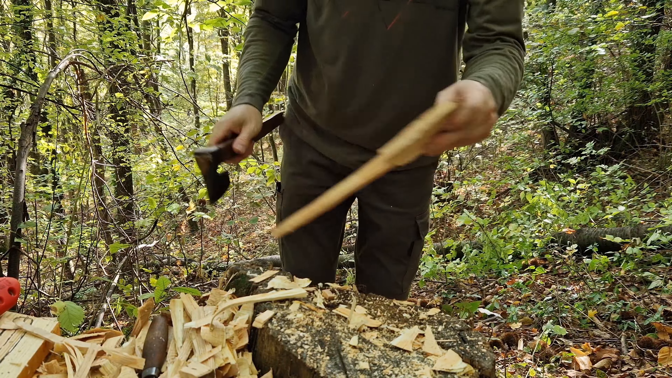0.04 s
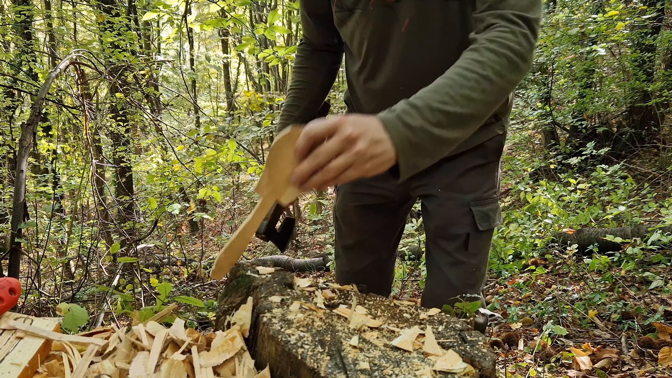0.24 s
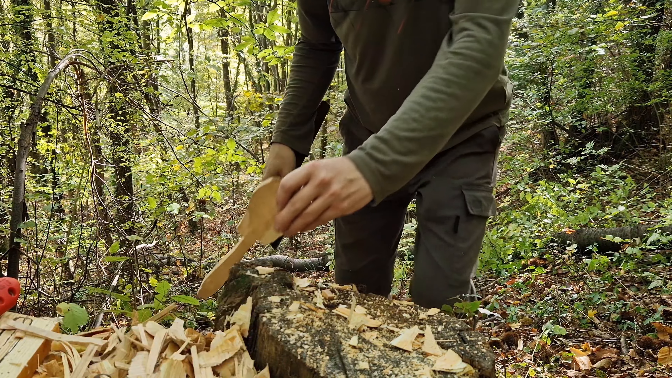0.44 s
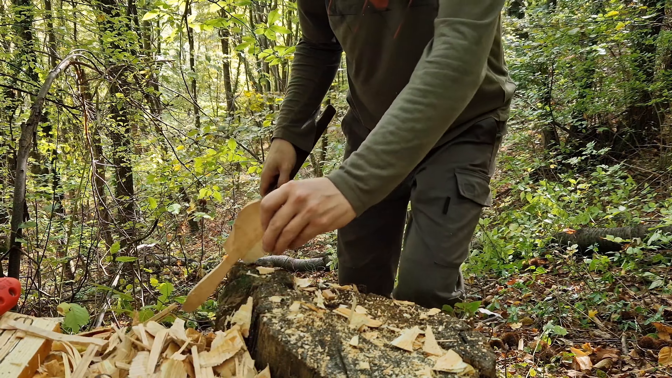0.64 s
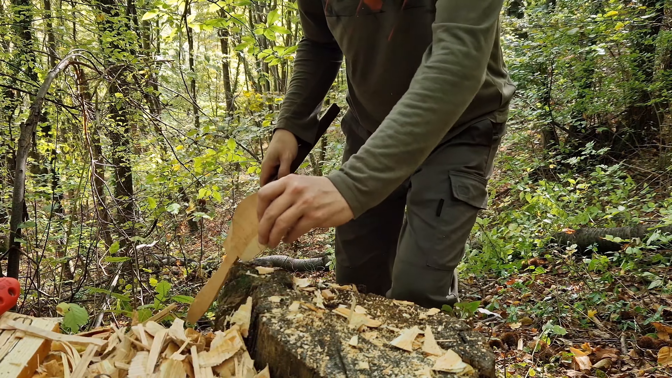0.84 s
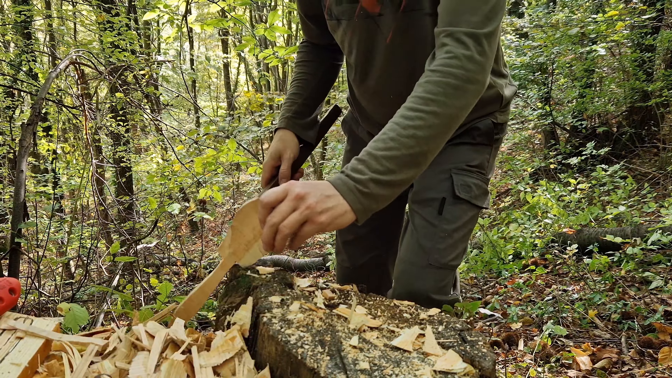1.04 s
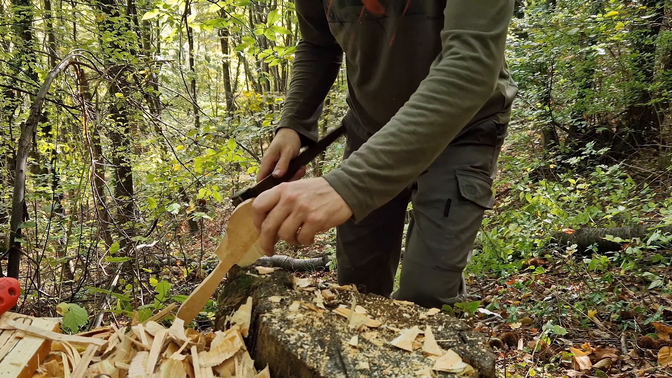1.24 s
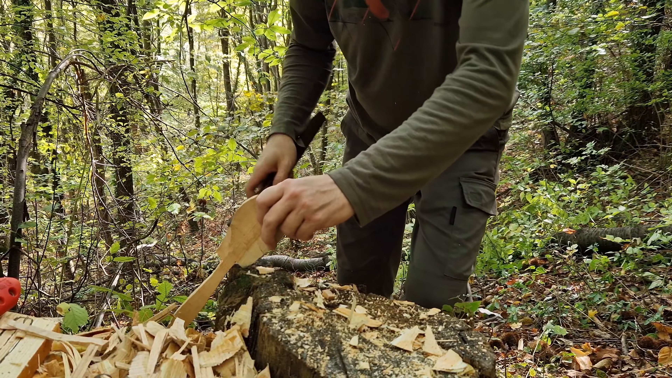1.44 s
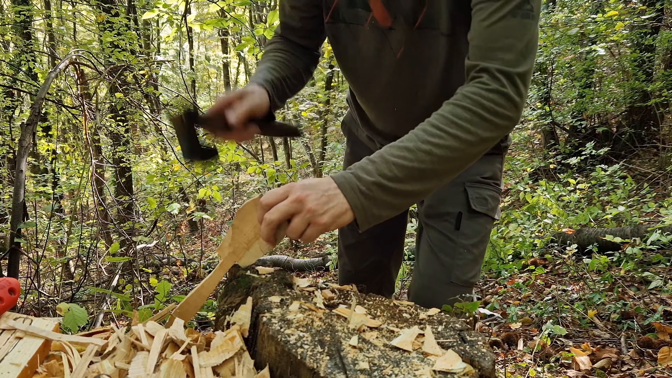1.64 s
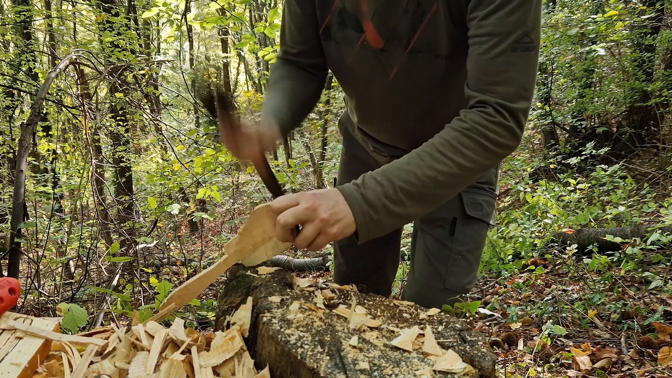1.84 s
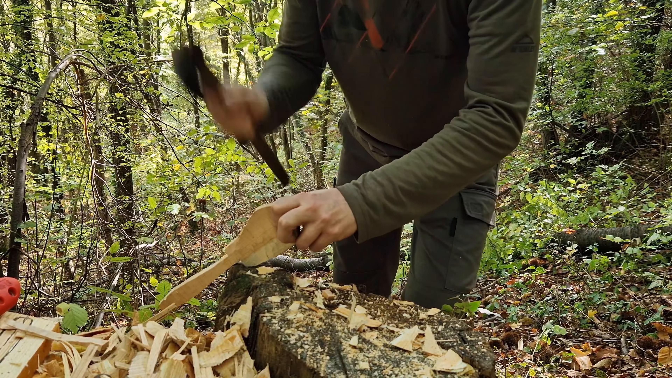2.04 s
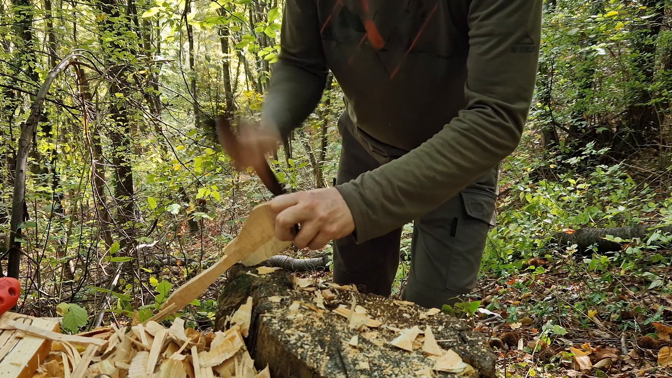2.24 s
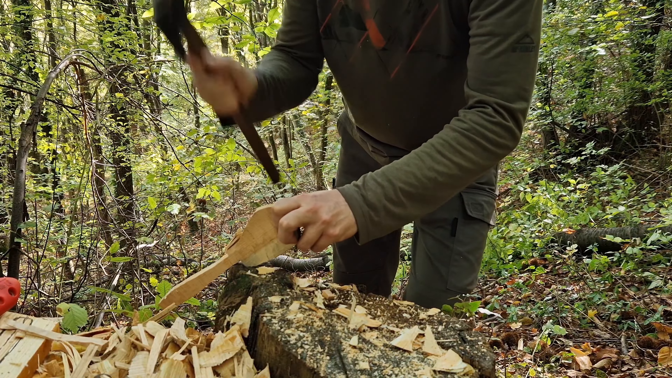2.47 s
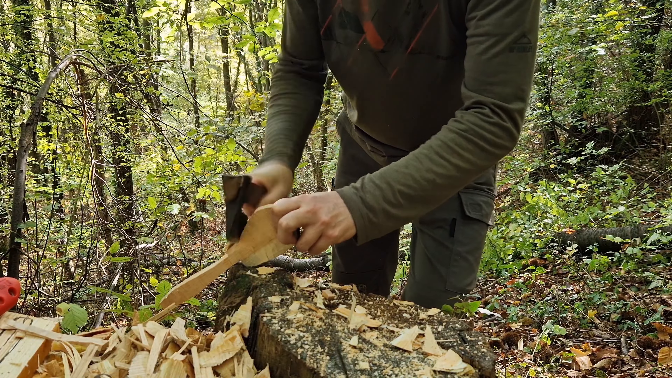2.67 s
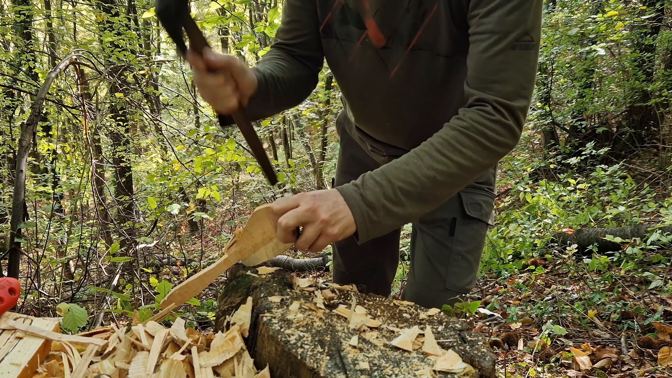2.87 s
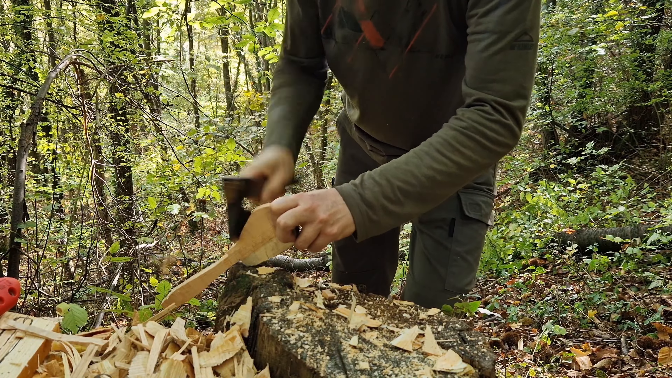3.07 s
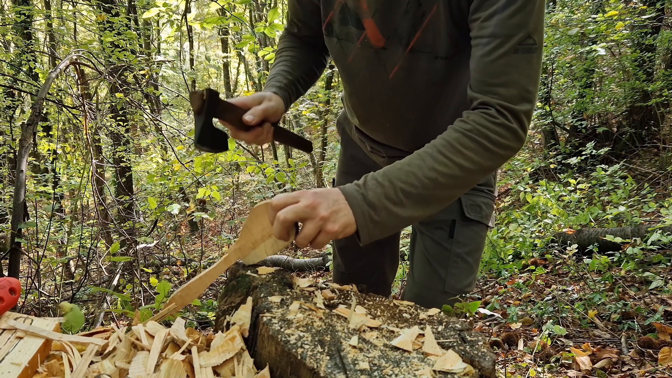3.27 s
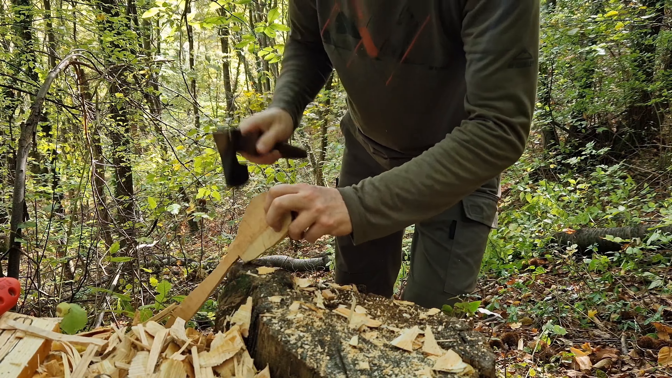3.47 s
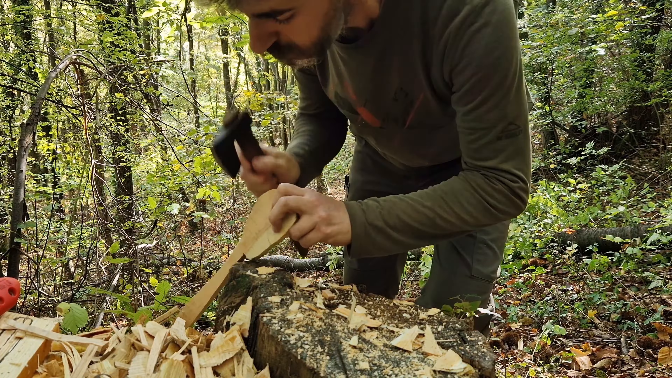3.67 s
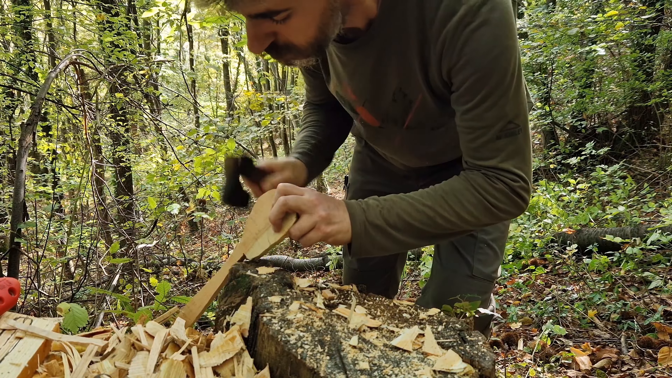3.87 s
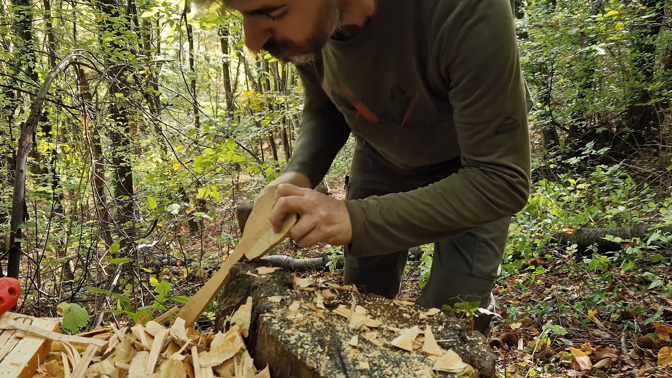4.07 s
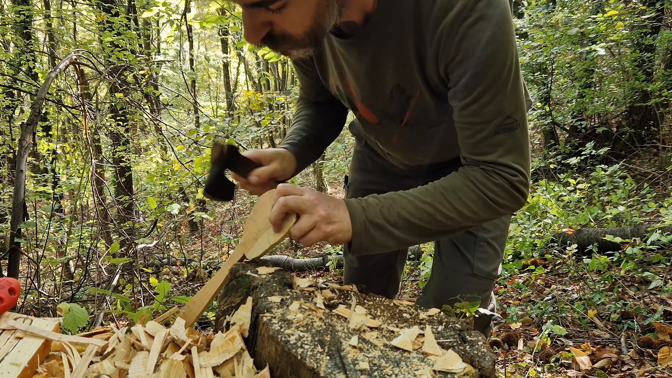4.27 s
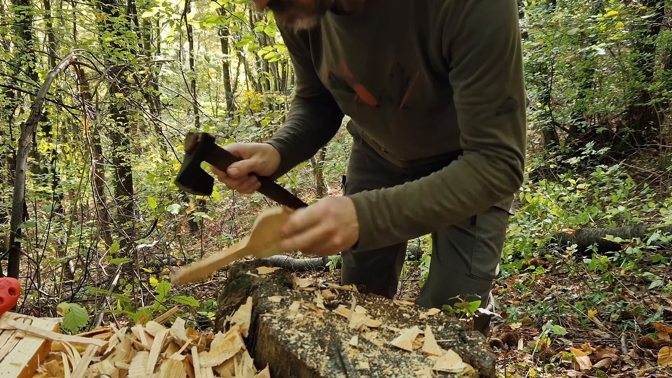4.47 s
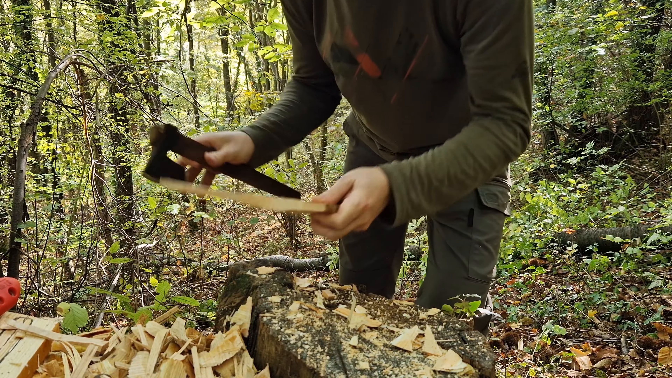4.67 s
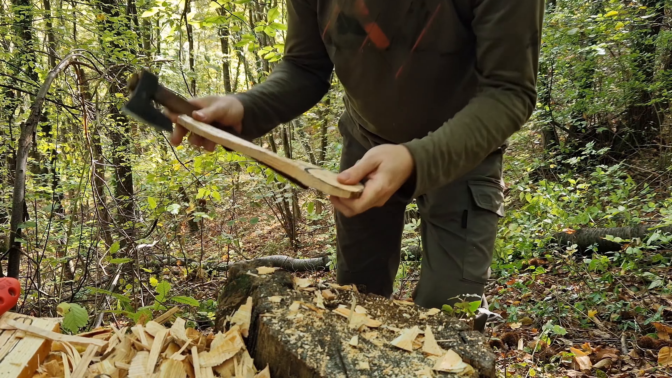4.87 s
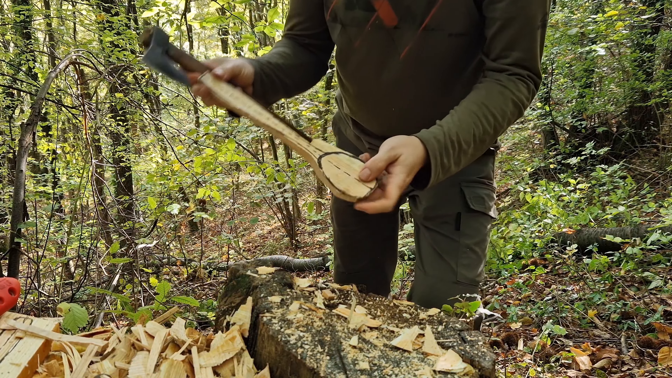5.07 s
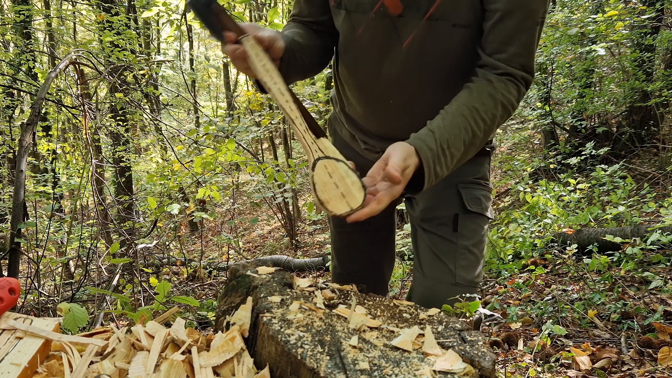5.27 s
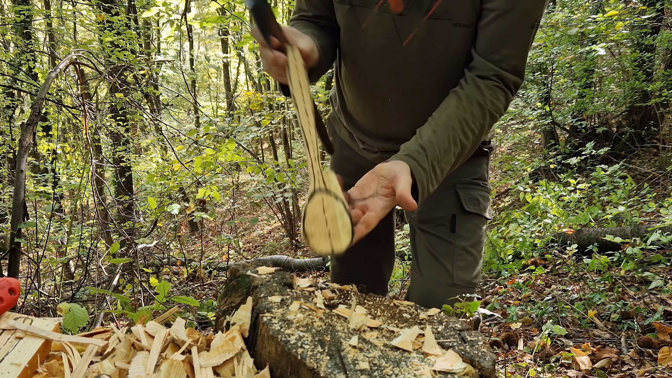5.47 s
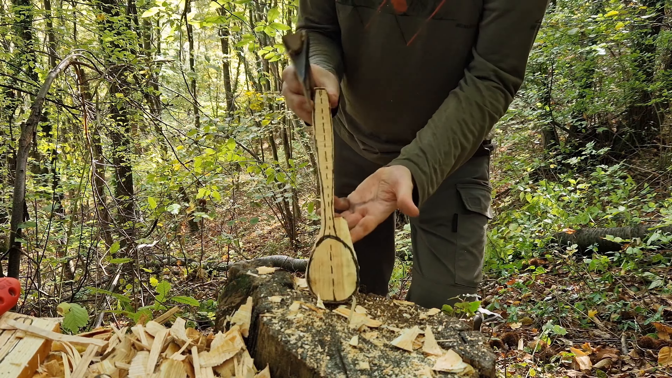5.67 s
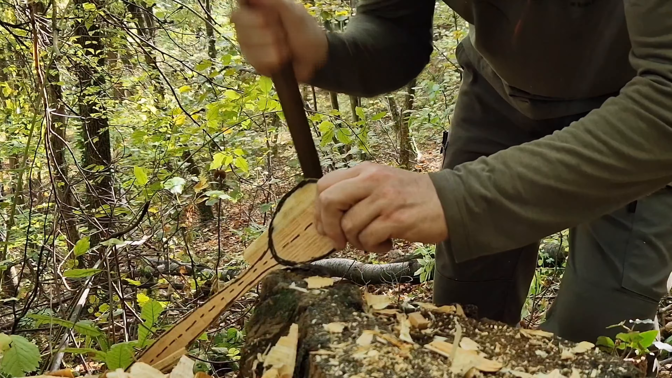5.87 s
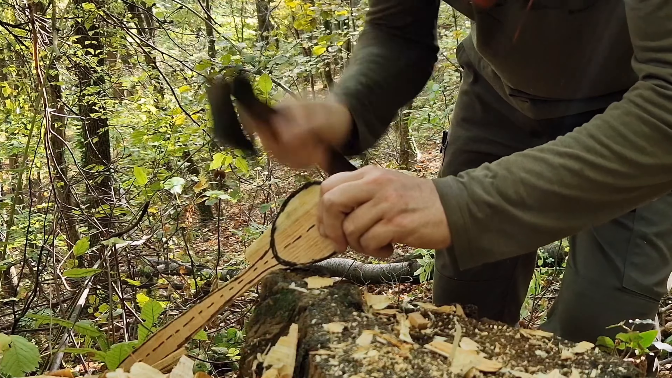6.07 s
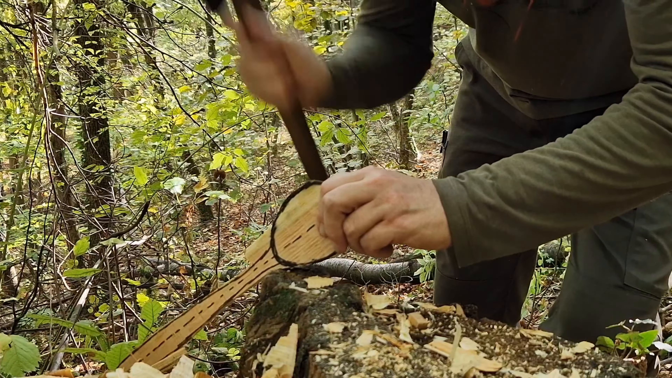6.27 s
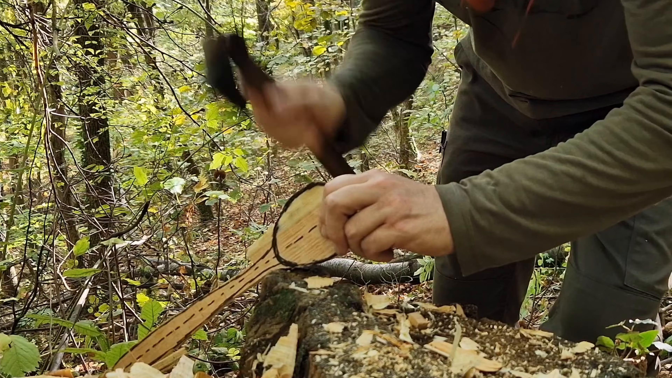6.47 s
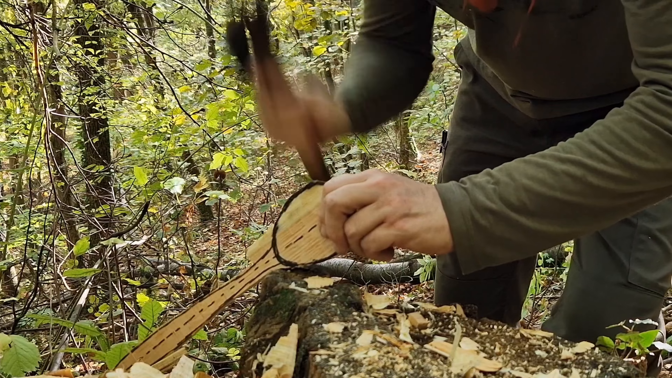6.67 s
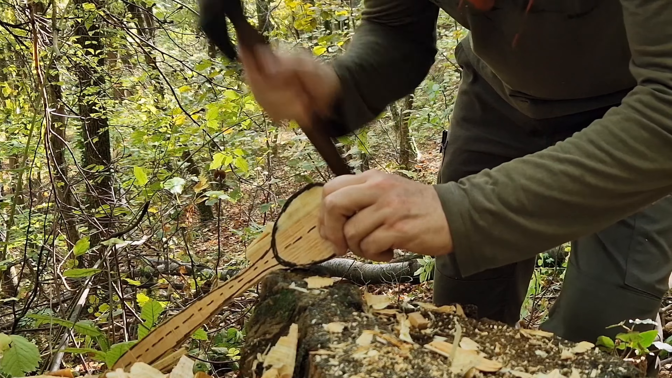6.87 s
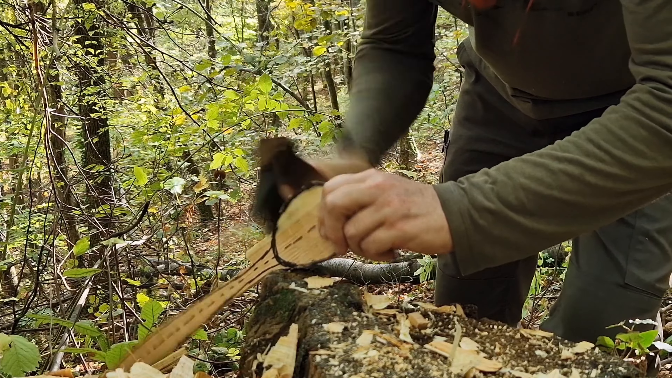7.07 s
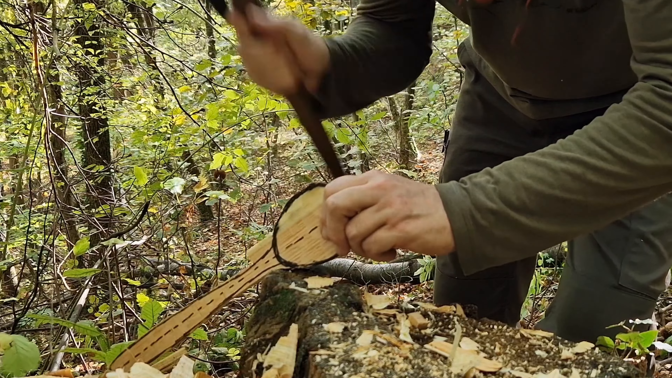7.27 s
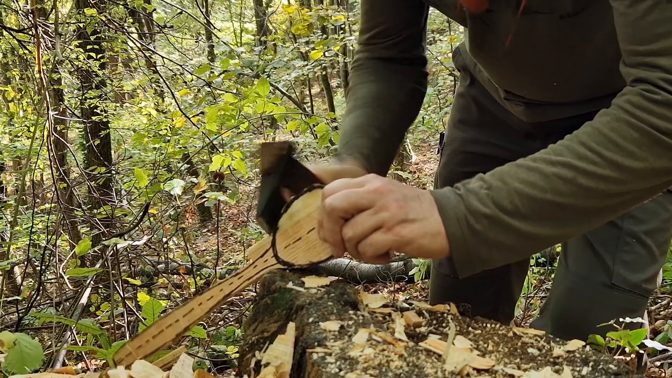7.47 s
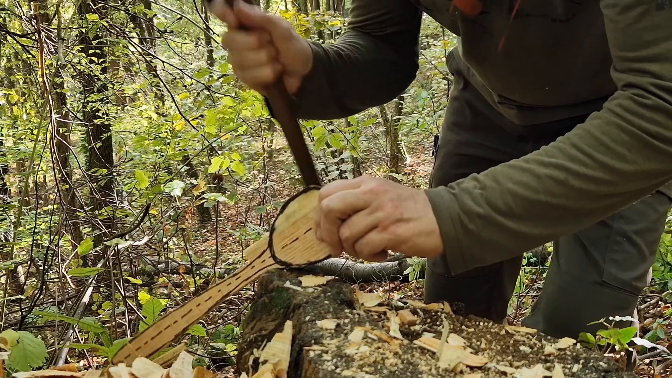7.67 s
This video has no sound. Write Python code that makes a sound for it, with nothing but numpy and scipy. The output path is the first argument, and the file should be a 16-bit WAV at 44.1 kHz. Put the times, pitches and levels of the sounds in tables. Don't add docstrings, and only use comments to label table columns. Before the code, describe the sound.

Faint traffic, breeze and wood rubs, six light axe knocks on a spoon blank, then a sudden closer view with five loud woody chops.

```python
import sys
import numpy as np
from scipy import signal
from scipy.fft import rfft, irfft, next_fast_len
from scipy.io import wavfile

SR = 44100
rng = np.random.default_rng(int(sys.argv[2]) if len(sys.argv) > 2 else 0)


def master(y):
    cut = np.clip(np.atleast_2d(y).T, -1, 1)
    pcm = np.round(cut * 32767)
    wavfile.write(sys.argv[1], SR, pcm.astype(np.int16))


def voltage_ratio(decibels):
    exponent = np.asarray(decibels, float) / 20
    return 10 ** exponent


N = 340452

# (time [s], peak [dB], ring of the blank [Hz], split delay [ms], crackle re peak [dB])
BLOWS = [(1.9339, -9.5, 1175, 2.16, -15.5), (2.3278, -10.5, 1280, 2.6, -15),
         (2.7070, -12, 1650, 4.04, -15.5), (3.0883, -13, 1616, 4.3, -10.5), (3.7930, -14, 1530, 9.4, -29.5),
         (4.0944, -13.5, 1481, 10.6, -31), (5.9850, -2.5, 1362, 4.4, -16), (6.3567, -1.5, 1340, 0.8, -16.5),
         (6.7260, 0.5, 1400, 3.75, -15), (7.09, 0, 1400, 3.4, -19), (7.457, 0, 1443, 2.35, -15.5)]
STOP_MS = 1.6
CLOSER_S = 5.752


def sample(s):
    return int(round(s * SR))


def rms_one(x):
    return x / np.sqrt(np.mean(x ** 2) + 1e-20)


def add(out, s, piece):
    i = sample(s)
    out[..., i:i + piece.shape[-1]] += piece[..., :N - i]


def in_time(rows, outside=None):
    s, *columns = np.transpose(rows)
    t = np.arange(N) / SR
    return [np.interp(t, s, column, outside, outside) for column in columns]


def at_hz(points, hz):
    table_hz, value = np.array(points).T
    return np.interp(np.log(hz), np.log(table_hz), value)


def drift(rate):
    r = np.exp(-80 * np.pi * rate / SR)
    white = rng.standard_normal(N // 40 + 2002)
    slow = signal.lfilter([1], [1, -2 * r, r * r], white)[2000:]
    return np.interp(np.arange(N) / 40, np.arange(len(slow)), rms_one(slow))


def ring(clicks, hz, t60):
    r, w = voltage_ratio(-60 / (t60 * SR)), 2 * np.pi * hz / SR
    return signal.lfilter([0, np.sin(w)], [1, -2 * r * np.cos(w), r * r], clicks + 1e-18)


def decay(kick, t60):
    return signal.lfilter([1], [1, -voltage_ratio(-60 / (t60 * SR))], kick)


def highpass(x, hz):
    return signal.sosfilt(signal.butter(2, hz, "high", fs=SR, output="sos"), x)


def colour(x, spectrum):
    size = next_fast_len(N)
    hz = np.maximum(np.arange(size // 2 + 1) * SR / size, 1)
    return irfft(rfft(x, size) * voltage_ratio(at_hz(spectrum, hz)), size)[..., :N]


def bands(spectrum, step, alike=None):
    # (frequency [Hz], correlation [-1..1])
    likeness = [(60, 0.97), (180, 1), (550, 0.083), (1650, 0.73), (4970, 0.75), (15000, 0.41)]
    low_hz, high_hz = spectrum[0][0], spectrum[-1][0]
    edges = low_hz * 2 ** np.arange(0, np.log2(high_hz / low_hz) + step / 2, step)
    white = colour(rng.standard_normal((2, 2, N)), spectrum)
    for k, (low, high) in enumerate(zip(edges, edges[1:])):
        band = signal.butter(2, [low, min(high, SR / 2.2)], "band", fs=SR, output="sos")
        mid, side = signal.sosfilt(band, white[k % 2])
        hz = np.sqrt(low * high)
        c = np.clip(at_hz(likeness, hz) if alike is None else alike, -1, 1)
        yield hz, np.sqrt(1 + c) * mid + np.sqrt(1 - c) * side * [[1], [-1]]


def patchy(spectrum, patchy_db, rate, alike=None):
    shared = drift(5.4)
    return rms_one(sum(x * voltage_ratio(patchy_db * (.5 * shared + drift(rate)))
                       for hz, x in bands(spectrum, 1 / 2, alike)))


def grip(s):
    regrip_s = 3.6
    return int(s > regrip_s) + int(s > CLOSER_S)


def surroundings():
    # (time [s], level [dB])
    traffic = [
        [(0.0, -64), (0.96, -70), (1.5, -64), (1.73, -67.5), (2.64, -68), (2.82, -72), (4.42, -72),
         (5.75, -69.5)],
        [(5.755, -59), (5.967, -53.5), (6.263, -56.5), (6.509, -58.5), (7.007, -61), (7.193, -63.5),
         (7.429, -68), (7.72, -65)],
    ]
    # (frequency [Hz], density [dB per Hz])
    rumble = [(12, -50), (20, -16), (38, -9), (70, -4.5), (84, -6), (103, -10), (160, -10), (210, -34),
              (350, -120)]
    hum = [(71, -30.5), (120, -3), (156, 1.5), (231, 3), (356, -20.5), (459, -27), (505, -19.5), (561, -17),
           (913, -31.5), (1500, -26), (1950, -59), (3300, -120)]
    # (frequency [Hz], density [dB per Hz])
    air = [(240, -27), (400, -2.5), (446, -18.5), (521, -9.5), (618, -16.5), (858, -17.5), (1030, -15),
           (1330, -30), (1410, -25), (2320, -21), (2890, -24), (5640, -26.5), (7580, -30), (8320, -42),
           (16500, -40)]
    # (time [s], level [dB])
    air_db = [(0.0, -80.5), (3.2, -78.5), (4.0, -83), (5.75, -83.5), (5.755, -79), (7.2, -74), (7.72, -79)]
    base_db, follows, closer_db, hum_db = -60.5, 0.47, 8.5, -1
    road_db, = in_time(traffic[0] + traffic[1])
    closer = np.arange(N) / SR > CLOSER_S
    rumble_db = base_db + follows * (road_db - base_db) + closer_db * closer
    road = voltage_ratio(rumble_db) * patchy(rumble, patchy_db=2.5, rate=1.2)
    road = road + voltage_ratio(road_db + hum_db) * patchy(hum, patchy_db=2.0, rate=7.4)
    breeze = patchy(air, patchy_db=.4, rate=20)
    return road + voltage_ratio(in_time(air_db)[0]) * breeze


def engines():
    # (time [s], level [dB])
    lorry_db = [(.2, -74), (.68, -65), (.76, -60), (1.12, -54.5), (1.24, -69), (1.4, -68.5), (1.66, -59.5),
                (1.78, -90)]
    # (time [s], level [dB])
    car_db = [(4.28, -94), (4.38, -67.5), (4.95, -58.5), (5.24, -64.5), (5.42, -70.5), (5.6, -105)]
    lorry_from_s, lorry_to_s, lorry_hz, lorry_hz_per_s = .25, 1.74, 55.2, 8.4
    car_from_s, car_hz, car_hz_per_s = 4.35, 87.5, 14
    overtones_db = -76
    t = np.arange(N) / SR
    turn = 2 * np.pi * np.cumsum(lorry_hz + lorry_hz_per_s * (t - lorry_from_s)) / SR
    on = np.clip(np.minimum((t - lorry_from_s) / 0.27 + 1, (lorry_to_s - t) / 0.027), 0, 1)
    lorry = voltage_ratio(in_time(lorry_db, -140)[0] + 2.0 * drift(6.9)) * np.sin(turn)
    for k in range(2, 11):
        level = voltage_ratio(overtones_db - 1.74 * k + 2.4 * drift(2.9))
        lorry += on * level * np.sin(k * turn + 0.7 * drift(4))
    turn = 2 * np.pi * np.cumsum(car_hz + car_hz_per_s * (t - car_from_s)) / SR
    car = voltage_ratio(in_time(car_db, -140)[0] + 0.99 * drift(6.7)) * np.sin(turn)
    return np.sqrt(2) * (lorry + car)


def rustle():
    # (time [s], length [s], level [dB], bright edge re level [dB])
    strokes = [(0.0, 1.8, -84.5, -27.5), (0.129, 0.075, -69.5, -15), (0.24, 0.13, -81, -20),
               (0.776, .04, -85, -30), (0.818, 0.033, -79, -21), (0.926, 0.075, -78.5, -19.5),
               (1.712, 0.054, -74.5, -27.5), (2.61, 0.079, -69.5, -4.5), (3.13, 0.12, -56, -12),
               (3.297, 0.093, -69.5, -25), (3.457, 0.049, -70.5, -22.5), (5.628, 0.064, -81, -26.5),
               (5.758, 0.092, -68, -24.5), (6.652, 0.05, -78, -11), (7.14, 0.067, -57, -7),
               (7.215, 0.071, -55, -13), (7.301, 0.078, -59, -22.5)]
    # (frequency [Hz], density [dB per Hz])
    leaves = [(410, -25), (700, -2), (1110, -9.5), (1220, 0.5), (1340, -7.5), (1480, -3), (1810, -8.5),
              (3710, -9), (4850, -7.5), (7470, -10.5), (8200, -17.5), (10700, -46.5), (18000, -120)]
    rise_s, fade_db = 0.017, 9
    grain = voltage_ratio(3.2 * drift(140))
    body = patchy(leaves, patchy_db=2.5, rate=13, alike=0.56)
    edge = patchy([(8000, 7.5), (16000, 2.2)], patchy_db=-1.0, rate=20, alike=0.2)
    level, edge_level = np.zeros((2, N))
    for s, length, db, edge_db in strokes:
        t = np.arange(sample(2 * length)) / SR
        stroke = np.minimum(t / rise_s, 1) * voltage_ratio(db - fade_db * t / length)
        stroke = stroke * np.minimum(2 - t / length, 1)
        start = max(s - rise_s, 0)
        add(level, start, stroke)
        add(edge_level, start, voltage_ratio(edge_db) * stroke)
    return grain * (level * body + edge_level * edge)


def squeaks():
    # (start [s], stop [s], level [dB])
    rubs = [
        (.29, 0.357, -74),
        (0.358, 0.499, -73.5),
        (0.594, .69, -81),
        (0.933, 1.028, -77),
    ]
    # (frequency [Hz], level [dB])
    rub_modes = [(1350, -11), (2580, -10), (4280, -7.5), (5200, -10)]
    # (start [s], stop [s], frequency [Hz], level [dB])
    lone = [
        (0.0, 0.17, 510, -70.5),
        (0.497, 0.548, 765, -81),
        (7.368, 7.378, 7500, -74),
    ]
    out, stutter = np.zeros((2, N)), voltage_ratio(4.8 * drift(38))
    rubbed = [(start, stop, hz, db + mode_db) for start, stop, db in rubs for hz, mode_db in rub_modes]
    for start, stop, hz, db in rubbed + lone:
        count = sample(stop - start)
        tone = ring(ring(rng.standard_normal((2, count)), hz, 0.011), hz, 0.011)
        add(out, start, voltage_ratio(db) * rms_one(tone) * np.hanning(count) ** 0.17)
    return out * stutter


def ticks():
    # (time [s], peak [dB], pitch [Hz], t60 [s], snap re pitch [dB])
    contacts = [(0.111, -63.5, 1340, 0.015, 2), (0.181, -45.5, 1090, 0.008, -17),
                (0.225, -54, 774, 0.0136, -15.5), (0.51, -72, 759, 0.0196, 0.5),
                (0.776, -55, 3500, 0.012, -15), (3.307, -43, 5100, 0.017, -19),
                (3.468, -59, 3210, 0.021, -9), (4.5983, -32.5, 5600, 0.0057, -9),
                (7.214, -23.5, 3350, 0.0045, 4), (7.28, -53, 1730, 0.0175, 3),
                (7.302, -27.5, 3600, 0.0037, -8), (7.314, -42, 2600, 0.0055, -10.5),
                (7.324, -45.5, 1390, 0.012, -10)]
    # (time [s], level [dB], frequency [Hz])
    bump = (5.645, -47.5, 166)
    out, t = np.zeros(N), np.arange(sample(0.11)) / SR
    for s, peak_db, hz, t60, snap_db in contacts:
        snap = rng.standard_normal(len(t)) * (np.exp(-t / 0.0011) + 0.095 * np.exp(-t / 0.014))
        snap[0] = 5.1
        body = ring(snap, hz, np.clip(t60, .002, .1))
        bright = np.diff(ring(snap, 1.5 * hz, 0.0003), prepend=0)
        mix = body / np.abs(body).max() + voltage_ratio(snap_db) * bright / np.abs(bright).max()
        add(out, s, voltage_ratio(peak_db) * mix / np.abs(mix).max())
    s, db, hz = bump
    add(out, s, voltage_ratio(db) * np.sin(2 * np.pi * hz * t) * t / 0.0025 * np.exp(1 - t / 0.0029))
    return out


def trees():
    # (frequency [Hz], density [dB per Hz])
    echo = [(150, -25.5), (250, 7), (444, -15), (748, -4), (938, -13), (1420, -10.5), (1880, -17.5),
            (2670, -17), (3650, -24.5), (4650, -22.5), (6140, -20), (7310, -24.5), (9330, -43),
            (11500, -26.5), (16000, -37)]
    # (frequency [Hz], t60 [s])
    echo_t60 = [(300, 0.39), (1000, 0.51), (2000, .48), (2700, 0.51), (3600, 0.45), (4650, 0.36),
                (7000, 0.5), (12000, 0.22)]
    # (level re peak [dB], brightness [dB per octave], more above 3 kHz [dB per octave])
    grip_echoes = [
        (-37, 1.5, 0.5),
        (-43, 3, -10),
        (-42.5, 1.5, 0),
    ]
    # (frequency [Hz], level re echo [dB], t60 [s])
    resonances = [(1480, -5.5, 0.4), (2600, -6, 0.39), (4590, -6, 0.33), (7220, -12, 0.23)]
    near_db, near_t60_s = 15.5, .07
    follows = .4
    out, scale = 0, 0
    s, peak_db, _, split_ms, _ = np.transpose(BLOWS)
    at = [sample(v) for v in s + (split_ms + STOP_MS) / 1000]
    grips = np.array([grip(v) for v in s])
    usual_db = np.array([peak_db[grips == g].mean() for g in grips])
    echo_db, tilt_db, top_db = np.array(grip_echoes)[grips].T
    echo_db = echo_db + usual_db + follows * (peak_db - usual_db)
    for hz, x in bands(echo, 1 / 3, alike=0.75):
        kick = np.full(N, 1e-18)
        kick[at] = voltage_ratio(echo_db + tilt_db * np.log2(hz / 2000) + top_db * max(np.log2(hz / 3000), 0))
        slow = decay(kick, at_hz(echo_t60, hz))
        quick = decay(kick, near_t60_s)
        out = out + x * (slow + voltage_ratio(near_db) * quick) * voltage_ratio(2.0 * drift(30) + 2.5 * drift(3))
        scale += np.mean(x ** 2)
    out = out / np.sqrt(scale)
    for hz, db, t60 in resonances:
        kick = np.full(N, 1e-18)
        kick[at] = voltage_ratio(echo_db + db + top_db * max(np.log2(hz / 3000), 0))
        noise = rng.standard_normal(N) + 0.71 * rng.standard_normal((2, N))
        tone = rms_one(ring(ring(noise, hz, 11.0 / hz), hz, 11.0 / hz))
        out = out + tone * decay(kick, t60)
    return out


def stump():
    thud_s = [1.9382, 2.3332, 2.7130, 3.0922, 3.808, 4.109, 5.9950, 6.3635, 6.7340, 7.0994, 7.4654]
    # (level [dB], knock [Hz])
    thuds = [(-18.5, 210), (-25, 197), (-14.5, 274), (-23.5, 230), (-30.5, 206), (-30.5, 256),
             (-13.5, 190.2), (-12, 240), (-13.5, 190), (-15, 224), (-14, 185)]
    # (frequency [Hz], level re landing [dB], t60 [s])
    deep_modes = [(106, -2, .11), (63.3, -7.5, 0.019)]
    knock_db, knock_t60_s, shove_db, shove_ms = -9, 0.084, 1.5, 1.7
    light_blow_db, light_knock_db = -17.5, 4.5
    lead_s = .008
    out, late = np.zeros(N), np.arange(sample(.25)) / SR - lead_s
    growing = np.exp(np.minimum(late, 0) * 1000 / shove_ms)
    letting_go = np.exp(-.5 * (late / 0.00038) ** 2)
    shove = -np.where(late < 0, growing, letting_go)
    for s, (thud_db, knock_hz) in zip(thud_s, thuds):
        light = s < CLOSER_S
        thud = voltage_ratio(shove_db) * highpass(shove, 170 if light else 60)
        modes = [(knock_hz, knock_db + light_knock_db * light, knock_t60_s)]
        modes += [(hz, db + light_blow_db * light, t60) for hz, db, t60 in deep_modes]
        for hz, db, t60 in modes:
            push = np.exp(-.5 * ((late + 0.21 / hz) / 0.0006) ** 2)
            thud = thud - voltage_ratio(db) * ring(push / push.sum(), hz, t60)
        add(out, s - lead_s, voltage_ratio(thud_db) * thud)
    return out


def axe():
    # (frequency [Hz], t60 [s])
    blank = [(580, 0.015), (960, 0.005), (1950, 0.0087), (2650, 0.013), (4450, .010)]
    stirred = [
        (-13.5, -6, -8, -12.5, -13),
        (-24.5, 5, 3, -16, -30.5),
        (-27, -23, -14, -12.5, -15),
    ]
    # (tearing re entry [dB], split re entry [dB], crackle brightness [dB per octave])
    tearing = [
        (-22, 1.0, -0.14),
        (-27.5, 0.5, -6),
        (-27, -3, -0.5),
    ]
    # (frequency [Hz], width [Hz], level [dB])
    crackle_modes = [(2500, 1500, 4), (4480, 870, -1.5), (6930, 550, -6.5), (10190, 2500, -21),
                     (13400, 2600, -9)]
    ring_t60_s, muffle_ms, touch_s = 0.012, 1.4, .0004
    out, t = np.zeros((2, N)), np.arange(sample(0.1)) / SR
    for s, peak_db, hz, split_ms, crackle_db in BLOWS:
        tear_db, split_db, bright_db = tearing[grip(s)]
        end = (split_ms + STOP_MS) / 1000
        after = np.maximum(t - end, 0)
        bite = np.minimum(t / 0.00099, 1) * np.exp(-after / 0.0013)
        tears = rng.standard_normal((3, len(t))) * voltage_ratio(4 * rng.standard_normal(len(t))) * bite
        clicks = voltage_ratio(tear_db) * tears[0] * (t < end)
        clicks[[0, sample(touch_s)]] += .3, -.8
        clicks[sample(split_ms / 1000)] += voltage_ratio(split_db)
        wood = ring(clicks, hz, ring_t60_s) * np.exp(-after * 1000 / muffle_ms)
        for db, (mode_hz, t60) in zip(stirred[grip(s)], blank):
            wood += voltage_ratio(db) * ring(clicks, mode_hz, t60)
        hiss = tears[0] + 1.7 * tears[1:]
        crackle = 0
        for mode_hz, width, db in crackle_modes:
            level = voltage_ratio(db + bright_db * np.log2(mode_hz / 4500))
            crackle = crackle + level * ring(hiss, mode_hz, 2.2 / width) * np.sqrt(width / SR)
        blow = wood / np.abs(wood).max() + voltage_ratio(crackle_db) * crackle
        add(out, s - touch_s, voltage_ratio(peak_db) * blow)
    return out


def ports(x):
    # (frequency [Hz], left over right [dB])
    balance = [(60, 0), (200, 0.3), (380, 0), (700, -.5), (1290, 1), (2380, 1.2), (4400, -2.5), (8120, 2.5),
               (15000, 3.4)]
    lag_samples, turn_hz, turn_width_hz = 4, 740, 260
    r, w = np.exp(-np.pi * turn_width_hz / SR), 2 * np.pi * turn_hz / SR
    poles = [1, -2 * r * np.cos(w), r * r]
    right = signal.lfilter(poles[::-1], poles, np.roll(x[1], lag_samples))
    half = np.array(balance) * [1, .5]
    return np.array([colour(x[0], half), colour(right, half * [1, -1])])


def smeared(x):
    far_db, far_s, near_db, near_s = -35.5, .03, -22.5, 0.0063
    ahead = np.arange(sample(far_s), 0, -1) / SR
    swell = voltage_ratio(far_db) * np.cos(np.pi / 2 * ahead / far_s) + voltage_ratio(near_db) * np.exp(-ahead / near_s)
    kernel = rng.standard_normal((2, len(ahead))) * swell / np.sqrt(len(ahead))
    copy = signal.fftconvolve(highpass(x, 700), kernel, axes=1)[:, :N]
    return x + np.roll(copy, -len(ahead), axis=1)


def scene():
    close = smeared(ports(axe() + stump() + ticks()))
    return close + trees() + rustle() + squeaks() + engines() + surroundings()


def roll_off(x):
    return signal.sosfilt(signal.butter(12, 16960, fs=SR, output="sos"), x)


def record(dry):
    x = highpass(dry, 38)
    x = .95 * np.tanh(x / .95)
    x = signal.sosfilt(signal.cheby2(10, 60, 16700, fs=SR, output="sos"), x)
    return roll_off(x)


dry = scene()
out = record(dry)
master(out)
```